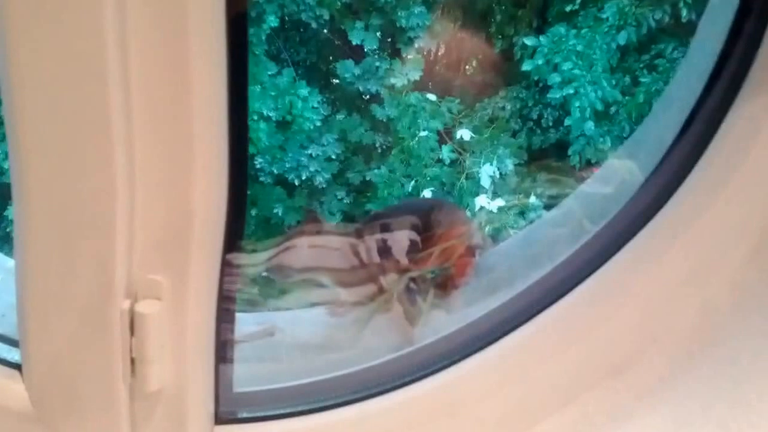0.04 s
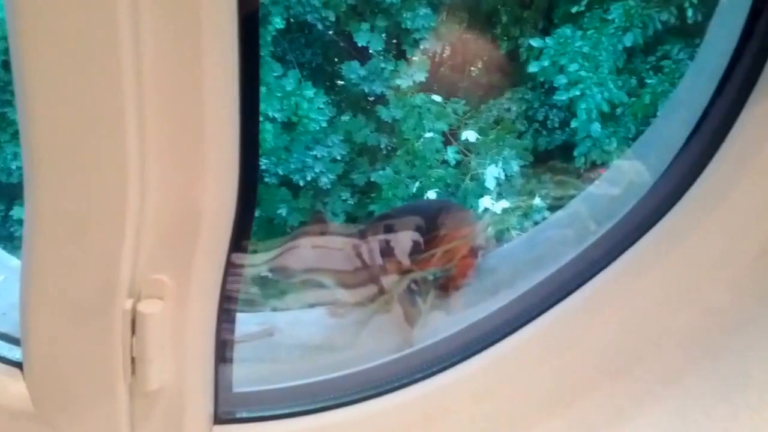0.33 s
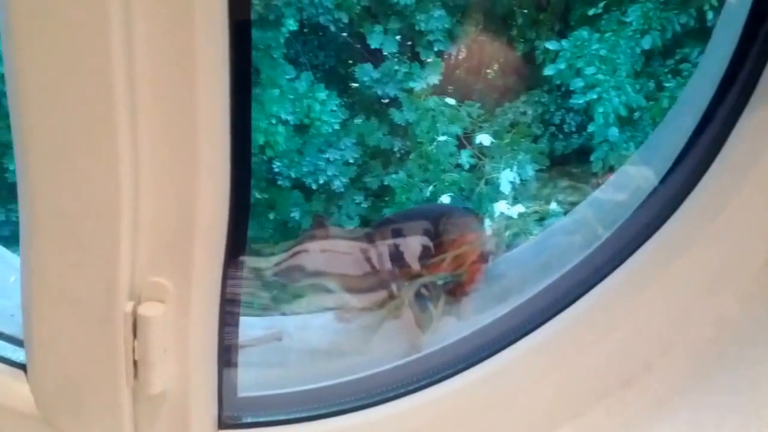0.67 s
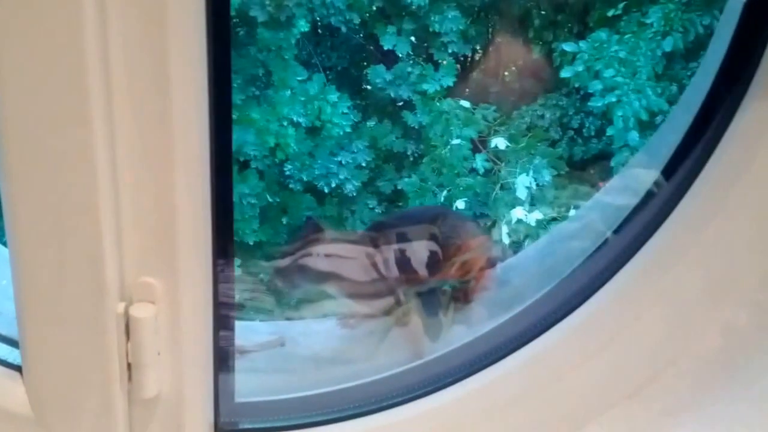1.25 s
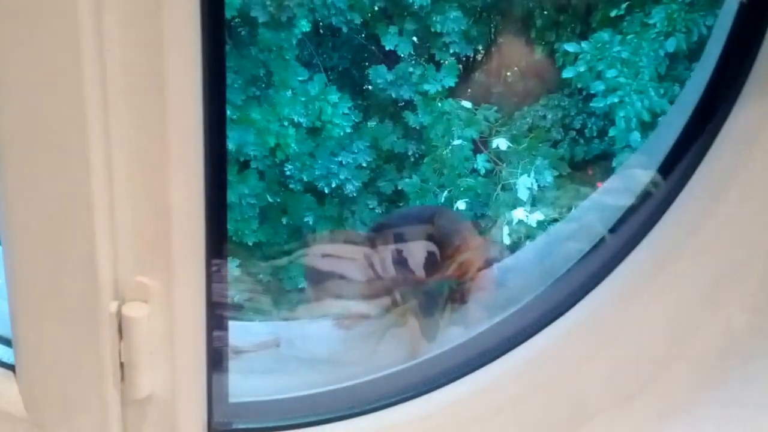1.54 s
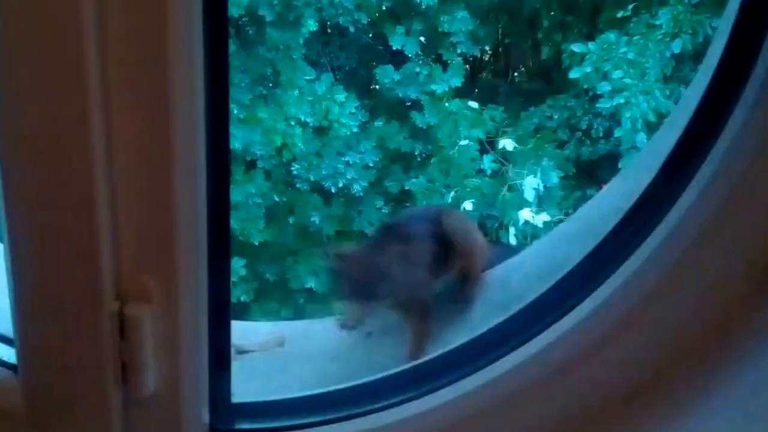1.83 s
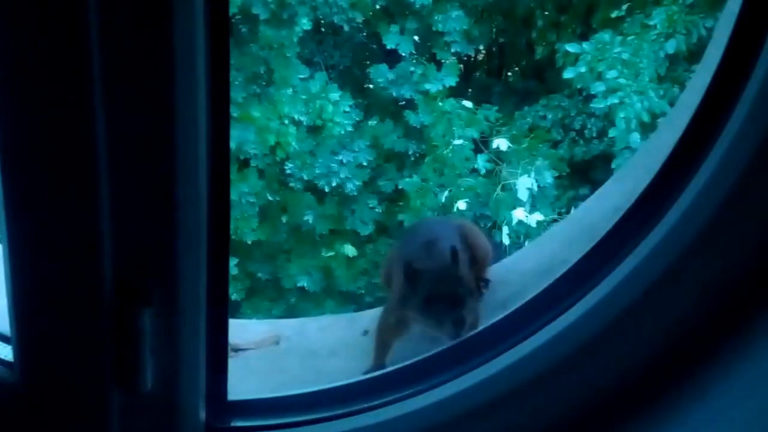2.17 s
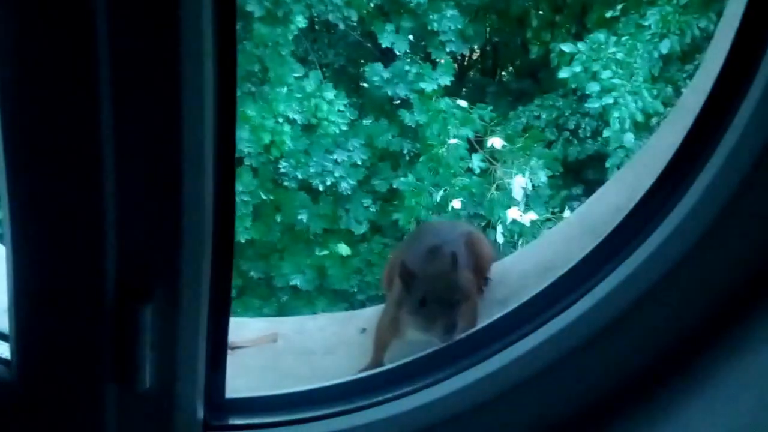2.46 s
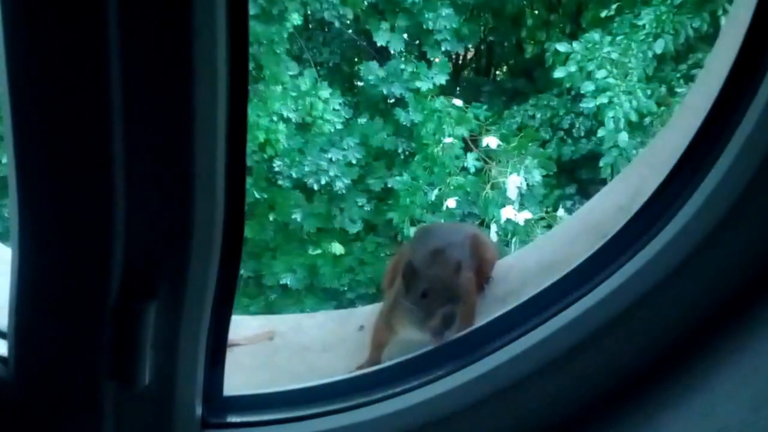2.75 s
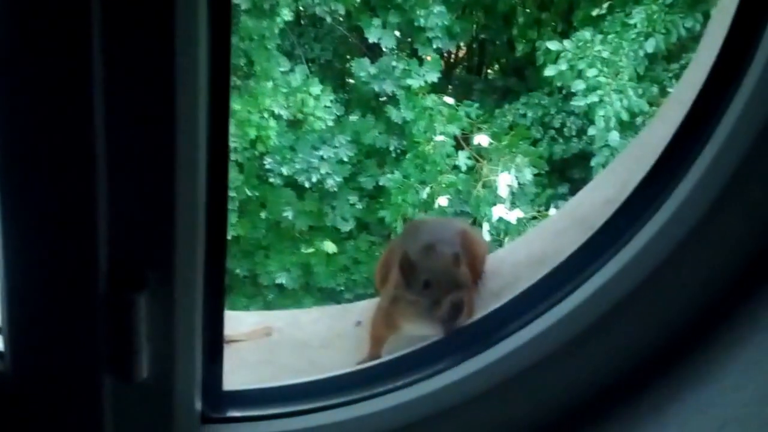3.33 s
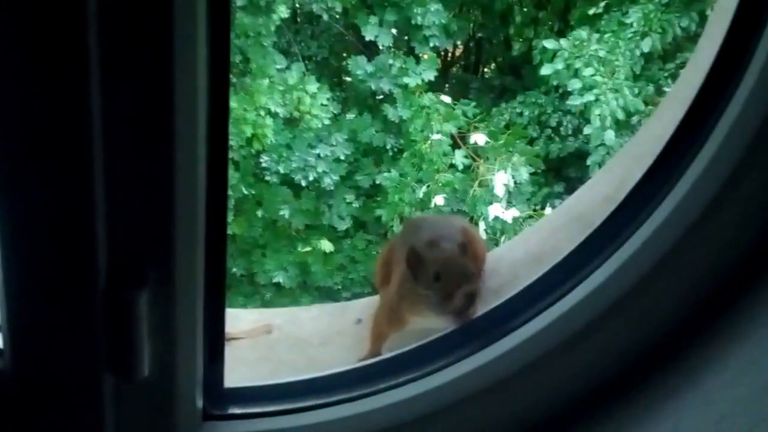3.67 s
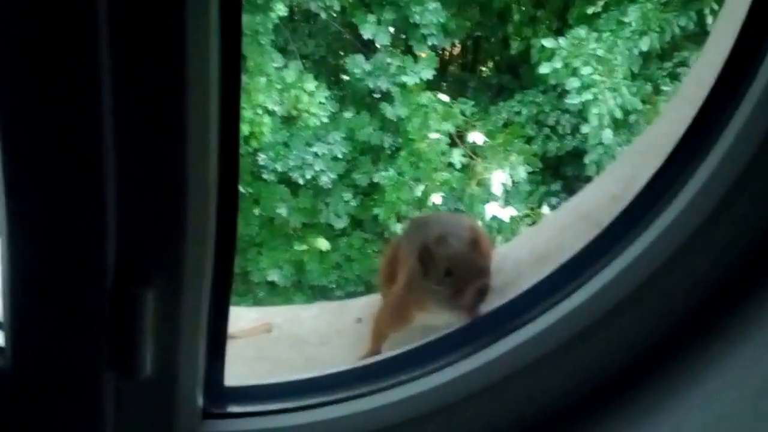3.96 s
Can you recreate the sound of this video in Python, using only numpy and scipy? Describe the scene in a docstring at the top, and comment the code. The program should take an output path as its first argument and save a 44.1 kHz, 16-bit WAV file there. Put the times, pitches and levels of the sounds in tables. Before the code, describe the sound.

In a quiet room, a soft touch is followed by the single crisp snap of a plastic light switch. Beneath it, a faint engine rises in pitch beyond a closed window, with low hum and thin microphone hiss.

```python
"""A light is switched off in a small, quiet room behind a closed window.
From the start, air murmurs in the room's resonances; the microphone adds bright hiss and faint ticks.
Outside, a muffled engine slowly gathers speed. At 1.2 seconds comes a soft touch, and at 1.8 one sharp
click as the switch's contacts snap over and its plastic body rings. The engine keeps rising and
beats (throbs) against a steady low hum as their pitches cross."""
import sys
import numpy as np
from scipy import signal
from scipy.fft import rfft, irfft
from scipy.io import wavfile

SR = 44100
rng = np.random.default_rng(int(sys.argv[2]) if len(sys.argv) > 2 else 0)


def bounce(signal):
    """Save signal as a 16-bit WAV file at the path given by the first command-line argument."""
    frames = np.transpose(np.atleast_2d(signal))
    limited = np.clip(frames, -1, 1)
    pcm = np.round(limited * 32767).astype(np.int16)
    wavfile.write(sys.argv[1], SR, pcm)


N = 176400
TIME = np.arange(N) / SR


def from_db(db):
    """Turn decibels into a number to multiply by."""
    return 10 ** (np.asarray(db) / 20)


def unit_level(x):
    """Scale a signal so its average level (rms) is one."""
    return x / np.sqrt(np.mean(x ** 2) + 1e-20)


def curve(rows):
    """Join (seconds, value) points with straight lines."""
    return np.interp(TIME, *np.transpose(rows))


def noise(colour):
    """Noise at level one, shaped by rows of frequency and relative dB."""
    hz, db = np.transpose(colour)
    bin_hz = np.maximum(np.arange(N // 2 + 1) * SR / N, 1)
    gain = from_db(np.interp(np.log(bin_hz), np.log(hz), db))
    return unit_level(irfft(rfft(rng.standard_normal(N)) * gain, N))


def resonant_noise(hz, width_hz):
    """Noise gathered around one pitch."""
    r = np.exp(-np.pi * width_hz / SR)
    feedback = [1, -2 * r * np.cos(2 * np.pi * hz / SR), r * r]
    return unit_level(signal.lfilter([1, 0, -1], feedback, rng.standard_normal(N + SR))[SR:])


def drift(rate_hz):
    """A slow random wobble, about one in size."""
    r = np.exp(-2 * np.pi * rate_hz / SR)
    return unit_level(signal.lfilter([1], [1, -2 * r, r * r], rng.standard_normal(N + SR))[SR:])


def keep_side(x, hz, side):
    """Keep the "low" or "high" side of a frequency."""
    return signal.sosfilt(signal.butter(2, hz, side, fs=SR, output="sos"), x)


def strike(start, rise_s, fade_s):
    """The loudness of a hit: a quick rise, and a fall of 60 dB per fade time."""
    age = np.maximum(TIME - start, 0)
    return np.minimum(age / rise_s, 1) * np.exp(-np.log(1000) * age / fade_s)


def ring(tones, start):
    """A struck object rings with tones that each fade at their own rate."""
    return sum(from_db(db) * np.sin(2 * np.pi * hz * (TIME - start)) * strike(start, .0006, fade_s)
               for hz, db, fade_s in tones)


# Room air and microphone hiss. Each row: frequency in Hz, relative level in dB.
AIR_COLOUR = [(20, 16), (33, 11), (70, 17.5), (100, 11), (170, 11.5), (230, 0), (270, -8), (450, 1.3),
              (900, -1), (1700, -6), (3000, -8), (5000, -10.5), (8000, -11), (11000, -7.5), (12600, -3),
              (14400, -3.5), (15700, -8.5)]
# Pitches that stand out in the air. Each row: pitch in Hz, width in Hz, level in dB.
AIR_PITCHES = [(214.5, 18.4, -72.5), (319.7, 37, -76.5), (449, 29, -78), (650.5, 21, -72.5),
               (689, 30, -76.5), (776, 22, -81.5), (977, 26, -83.5), (1140, 25, -77), (1297, 14, -81.5),
               (1425, 35, -78), (1573, 37, -77), (1739, 25, -82), (1997, 113, -77.5), (2347, 31, -82),
               (2767, 23, -86), (12280, 110, -82)]

def air():
    """Soft, even noise murmurs in narrow resonances."""
    murmur = sum(from_db(db) * resonant_noise(hz, width) for hz, width, db in AIR_PITCHES)
    return from_db(-59) * noise(AIR_COLOUR) + murmur


def ticks(first_s=.0779, gap_s=.4708, width_s=.00014, pitch_hz=14400):
    """The microphone adds tiny, very high ticks, about two a second."""
    from_tick_s = (TIME - first_s + gap_s / 2) % gap_s - gap_s / 2
    pulse = np.exp(-.5 * (from_tick_s / width_s) ** 2)
    return from_db(-48) * pulse * np.sin(2 * np.pi * pitch_hz * from_tick_s)


# How loud the hum is. Each row: time in seconds, level in dB.
HUM_LOUDNESS = [(0.0, -57), (0.6, -55.5), (1.2, -66), (1.75, -55.5), (2.3, -52), (2.85, -54), (3.25, -58),
                (3.5, -55.5), (4.0, -60)]

def hum(pitch_hz=66.8):
    """A low tone of steady pitch swells and sinks."""
    return np.sqrt(2) * from_db(curve(HUM_LOUDNESS)) * np.sin(2 * np.pi * pitch_hz * TIME)


# How fast the engine fires. Each row: time in seconds, firings per second.
FIRING_RATE = [(0, 42.7), (.2, 42.4), (.55, 41.7), (1.0, 44.3), (1.55, 51.6), (1.8, 55.8), (2.35, 61.5),
               (2.75, 66.1), (3.15, 69.5), (4, 76.7)]
# The tone at that rate. Each row: time in seconds, level in dB.
FIRING_LOUDNESS = [(0.0, -55.5), (0.2, -53), (0.5, -60.5), (0.75, -51.3), (1.1, -47.9), (1.48, -43.9),
                   (1.59, -48.8), (1.66, -59), (1.76, -53.5), (2.05, -54), (2.22, -50.2), (2.45, -53.5),
                   (2.75, -63.8), (3.2, -65.9), (4.0, -66.8)]
# The tone at three times that rate. Each row: time in seconds, level in dB.
THIRD_LOUDNESS = [(0, -74.5), (1.3, -72.5), (1.8, -80), (2.4, -73), (2.8, -67.5), (3.15, -64.5),
                  (3.45, -64.5), (4, -71.5)]
# The engine's rumble. Each row: frequency in Hz, relative level in dB.
RUMBLE_COLOUR = [(60, -11.5), (160, 0.5), (225, 6), (270, -17), (340, -4), (500, -20), (1500, -63),
                 (15000, -79)]

def engine(boom_hz=223.4, boom_width_hz=11.5):
    """Through the wall come the firing tone, its overtones and a rumble that grows with speed."""
    rate = curve(FIRING_RATE)
    phase = 2 * np.pi * np.cumsum(rate) / SR
    firing = from_db(curve(FIRING_LOUDNESS) + .4 * drift(rate_hz=6.7)) * np.sin(phase)
    third = from_db(curve(THIRD_LOUDNESS) + 2 * drift(rate_hz=8)) * np.sin(3 * phase)
    # Two higher tones swell as they pass a pitch at which the room booms.
    upper = np.zeros(N)
    for multiple, peak_db in [(4, -68), (5, -77.5)]:
        boom = 1 / np.hypot(1, 2 * (multiple * rate - boom_hz) / boom_width_hz)
        upper += from_db(peak_db) * boom * np.sin(multiple * phase)
    rumble = from_db(-67.5) * (rate / rate.max()) ** 1.85 * noise(RUMBLE_COLOUR)
    return np.sqrt(2) * (third + upper - firing) + rumble


# The noise of the touch. Each row: frequency in Hz, relative level in dB.
TOUCH_COLOUR = [(200, -18), (650, 8), (1200, -2), (1800, -1), (2500, -2), (3000, -11), (4300, -6),
                (8000, -22), (15000, -30)]
# Its ring. Each row: pitch in Hz, relative level in dB, fade time in seconds.
TOUCH_TONES = [(1115, -3, 0.099), (2540, -3, .05)]

def touch(start_s=1.19):
    """A faint tap rings briefly before the click."""
    tap = noise(TOUCH_COLOUR) * strike(start_s, rise_s=.0025, fade_s=.19)
    return from_db(-59.5) * (tap + ring(TOUCH_TONES, start_s))


# The switch's quick contacts, the first one thin.
# Each row: start in seconds, level in dB, frequency in Hz below which the crack is turned down.
SWITCH_CONTACTS = [(1.7663, -40.5, 9900), (1.7685, -46, 300), (1.7693, -45, 4000), (1.7728, -41, 300)]
# The noise of one contact. Each row: frequency in Hz, relative level in dB.
SNAP_COLOUR = [(150, -26), (800, -10), (1500, -19), (2600, -14), (4000, -10), (8000, -5.5), (10800, -3),
               (12200, 8), (14600, 8), (15200, -4), (15800, -7)]
# The plastic body's ring. Each row: pitch in Hz, relative level in dB, fade time in seconds.
BODY_TONES = [(162, -12, 0.17), (650, -15, 0.06), (834, -18, 0.12), (1110, -13, 0.039), (1480, -25, 0.06),
              (2070, -14.5, 0.044), (2540, -12.5, 0.036), (2945, -16.5, 0.048), (4520, -22.5, 0.044),
              (5340, -22, 0.077), (5523, -22, 0.064), (6260, -17, 0.04), (7700, -17, 0.063),
              (8460, -13, 0.041)]

def switch(split_hz=2000):
    """Each contact cracks and echoes briefly, longer in the bass; the first sets the body ringing."""
    click = np.zeros(N)
    for start, db, lowest_hz in SWITCH_CONTACTS:
        crack = keep_side(noise(SNAP_COLOUR), lowest_hz, "high")
        crack *= strike(start, rise_s=.0006, fade_s=.017)
        room_bass = from_db(-1) * keep_side(noise(SNAP_COLOUR), split_hz, "low")
        room_bass *= strike(start, rise_s=.007, fade_s=.23)
        room_treble = from_db(-8.5) * keep_side(noise(SNAP_COLOUR), split_hz, "high")
        room_treble *= strike(start, rise_s=.0023, fade_s=.091)
        click += from_db(db) * (crack + room_bass + room_treble)
    first_s, first_db, _ = SWITCH_CONTACTS[0]
    return click + from_db(first_db) * ring(BODY_TONES, first_s)


def scene():
    """All the sounds together, the same on the left and right."""
    return np.tile(air() + ticks() + hum() + engine() + touch() + switch(), (2, 1))


# Where the microphone rings. Each row: pitch in Hz, width in Hz, relative level in dB.
MIC_PITCHES = [(11950, 79, -13), (13000, 200, -15)]

def record(dry):
    """The microphone rings faintly in the high treble and cuts steeply above that."""
    out = dry
    for hz, width_hz, db in MIC_PITCHES:
        resonance = signal.iirpeak(hz, hz / width_hz, fs=SR)
        out = out + from_db(db) * signal.lfilter(*resonance, dry)
    treble_cut = signal.ellip(12, .1, 70, 15740, fs=SR, output="sos")
    return signal.sosfilt(treble_cut, out)


dry = scene()
out = record(dry)
bounce(out)
```